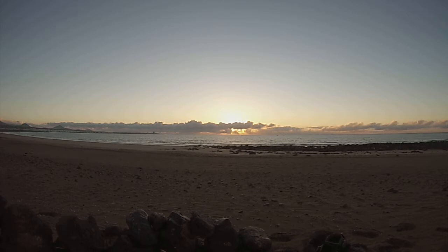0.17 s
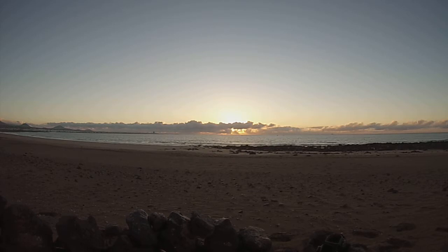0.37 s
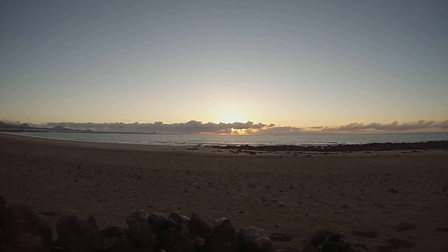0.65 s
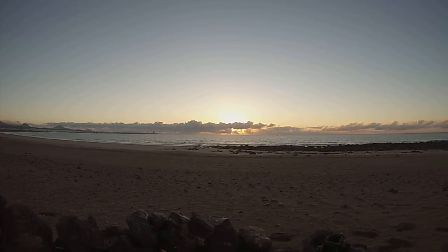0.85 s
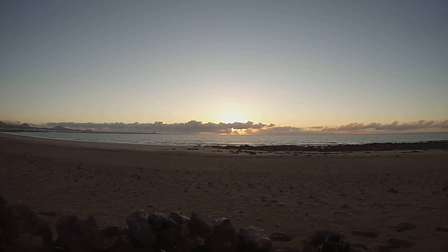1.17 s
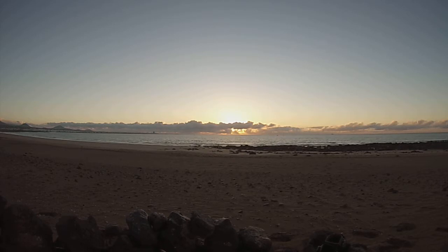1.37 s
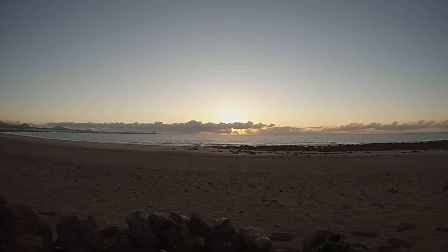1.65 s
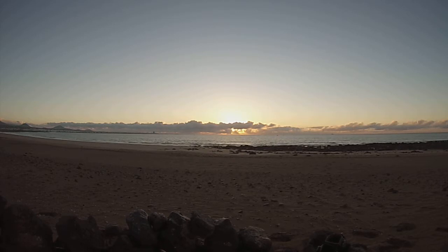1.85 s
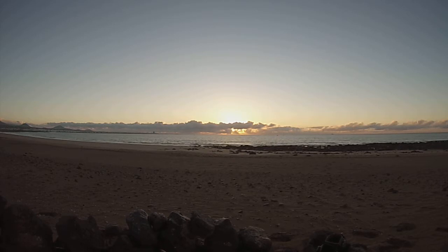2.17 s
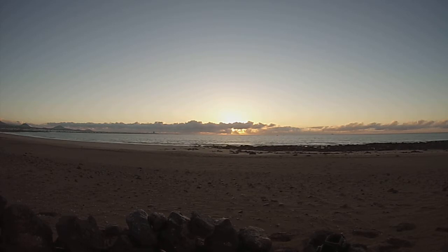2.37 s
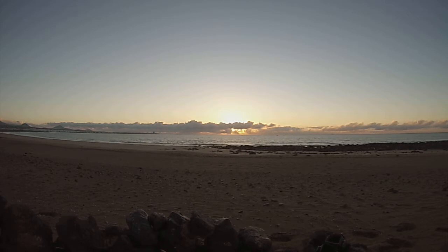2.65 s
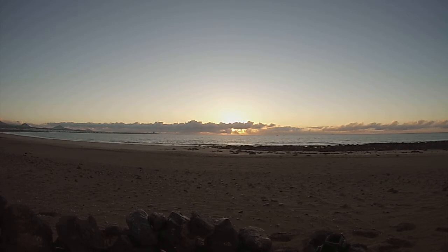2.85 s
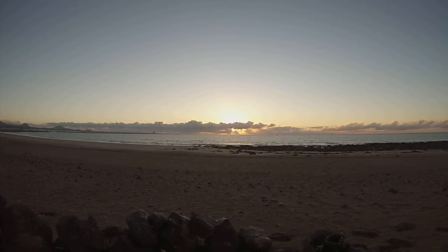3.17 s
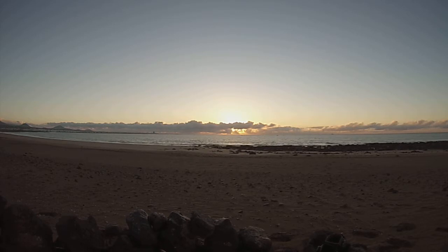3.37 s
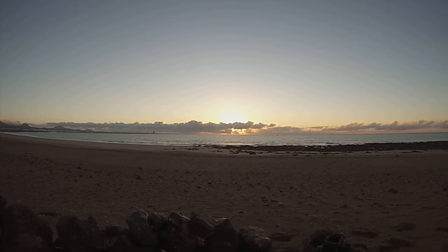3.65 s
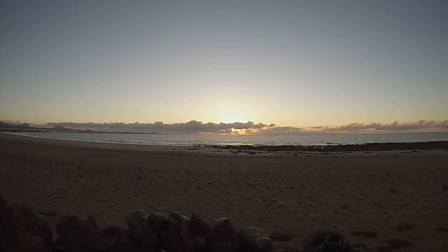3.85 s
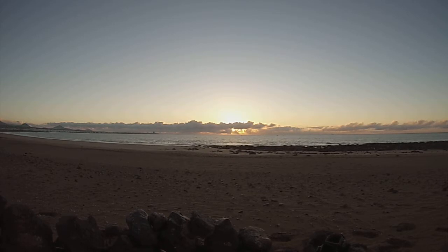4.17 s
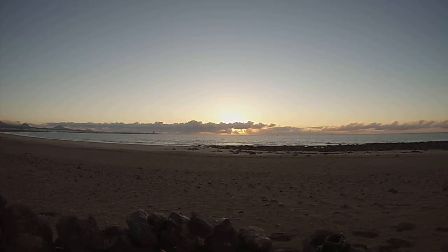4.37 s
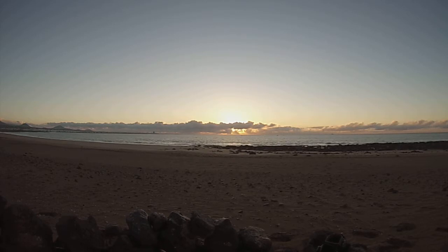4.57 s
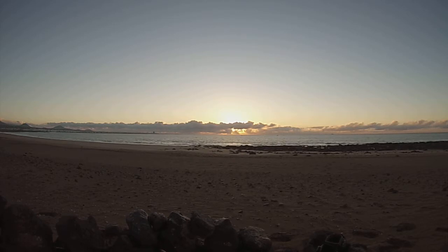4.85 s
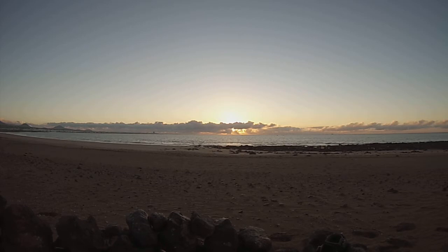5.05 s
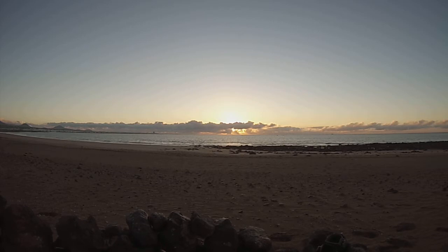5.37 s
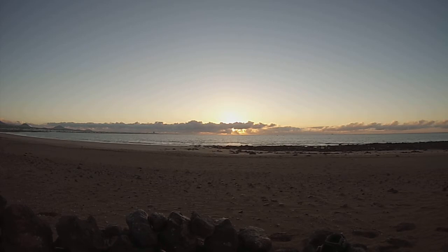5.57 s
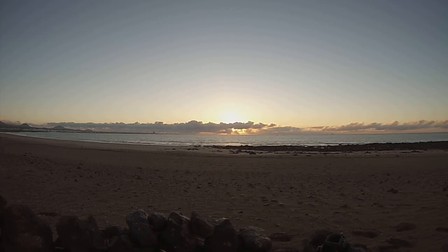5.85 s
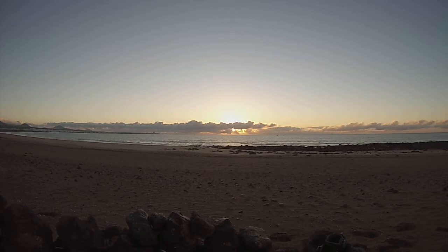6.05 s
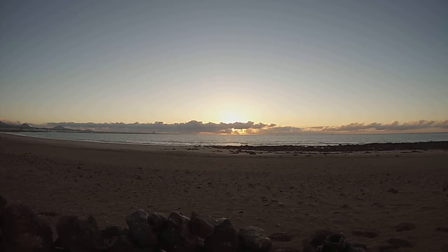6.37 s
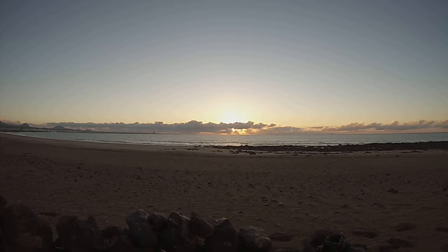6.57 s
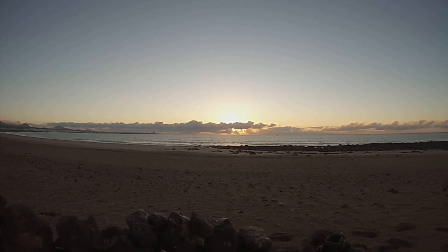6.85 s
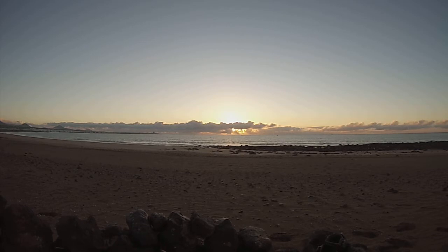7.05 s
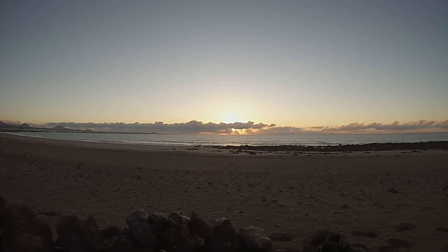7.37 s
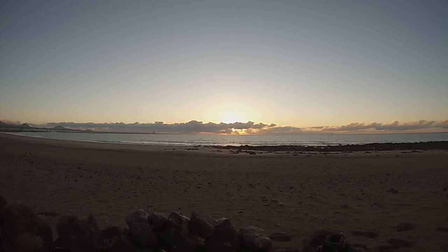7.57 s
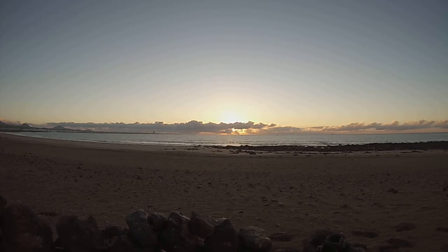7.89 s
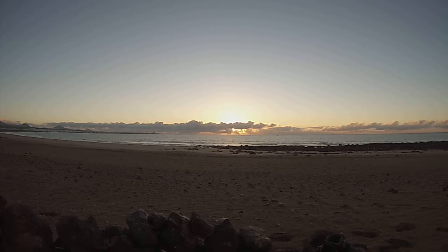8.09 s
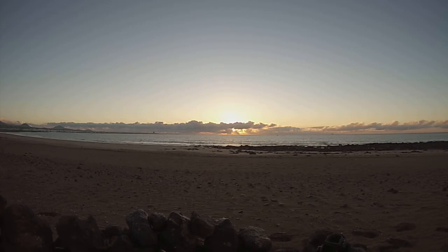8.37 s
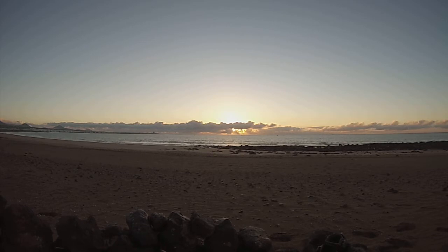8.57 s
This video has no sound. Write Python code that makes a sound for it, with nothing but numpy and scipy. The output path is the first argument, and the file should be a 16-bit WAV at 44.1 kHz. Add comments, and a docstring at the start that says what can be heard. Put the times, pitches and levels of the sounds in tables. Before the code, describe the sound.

On an open beach, faint far surf and light microphone hiss lie beneath a distant turboprop aircraft. From 0 to 1 s its low drone is steady while the airy rush is weak and patchy, with a brief puff near 0.6 s. Gusts lift it in quick swells around 1.2 and 1.8 s, then it climbs steeply from 2 to 3 s into a broad, buzzing roar, chopped rapidly by the blades. From 3 to 6 s it stays strong and fluttering, with a dip near 4.1 s; blade hum and gear tones come forward. It is fullest around 6.4 s, with hissy high turbine whine strongest near 7 s, as all pitches slide downward. After 7.9 s the rush falls away, still sounding at 8.7 s. Mono, midrange-heavy, hollow ringing colour from a small enclosed camera, softened top.

```python
"""On a beach, an aircraft flies past in a straight line while far surf lies underneath, as shaped noise.
Its rush is noise that throbs once per blade; its low exhaust roar is smoother noise. Blade and gear hum and
turbine whines are sine tones. Throb and tones slide down in pitch as it passes. Gusty air makes the rush
surge, and the closed case of a small camera rings at a few pitches and shades the treble by direction."""
import sys
import numpy as np
from scipy import signal
from scipy.fft import rfft, irfft, next_fast_len
from scipy.io import wavfile
from scipy.ndimage import uniform_filter1d, map_coordinates

SR = 44100
rng = np.random.default_rng(int(sys.argv[2]) if len(sys.argv) > 2 else 0)


def to_wav(sig):
    """Store sig (one row per channel, or 1-D mono) as 16-bit WAV at the path in sys.argv[1].

    Samples outside -1..1 are clipped; the rate is SR.
    """
    pcm = np.clip(np.atleast_2d(sig), -1, 1) * 32767
    pcm = np.round(pcm).astype(np.int16)
    wavfile.write(sys.argv[1], SR, pcm.T)  # frames by channels


N = 384552  # length in samples
FRAME, HOP = 1024, 256  # samples per short-time spectrum, and between spectra

# The flight
MACH = .1687  # ground speed over the speed of sound
PASS_S = 2.797  # seconds the aircraft needs to fly a length equal to its closest distance
ABEAM_S = 7.343  # second at which the sound from the closest point arrives
BLADE_HZ = 69.204  # blades passing per second at the source

# Angles in degrees at which the hum, whine and colour tables are read; negative is before abeam (side-on).
AIM_DEG = [-72, -67, -60, -47, -33, -23, -3, 12, 26]

# Band edges of the rush in Hz. From low to high its bands are low, body, sizzle, hiss and air.
RUSH_EDGES_HZ = [1000, 1900, 2900, 5400, 7500, 10500]
# Slow level of the rush, before gusts. Each row: time in seconds, body level in dB.
RUSH_LEVEL = [(0, -58), (.15, -66.5), (.45, -69), (1, -61.5), (1.5, -60.5), (1.9, -58.5), (2.35, -50.5),
              (2.75, -47.5), (3.1, -44), (3.9, -45.5), (4.4, -43.5), (5.3, -45), (6.4, -41), (7.1, -43),
              (7.85, -44.5), (8.15, -50.5), (8.72, -51.5)]
# Colour of the rush by direction. One row per band: low and sizzle in dB over the body,
# then hiss and air in dB over the sizzle. Each column is one angle of AIM_DEG.
RUSH_COLOUR = [(0, -5.5, -7, -5.5, -4, -5.5, -5, -0.5, -1.5),
               (-6, -1, -6.5, -3.5, -9, -12.5, -11.5, -8.5, -6),
               (-27, -36, -22.5, -18.5, -11, -10.5, -4, -4, -12),
               (-20, -27, -23, -14, -12.5, -13.5, -18.5, -22.5, -19)]

# Swells and lulls as gusts bend the sound.
# Each row: middle in seconds, half width in seconds, body change in dB, sizzle change in dB.
SURGES = [(.58, .04, 6.5, 8), (1.08, .08, 3.5, -0.5), (1.2, 0.086, 7.5, 4.5), (1.77, 0.056, 11.5, 11),
          (2.0, 0.1, 1, 9.5), (2.18, 0.047, 2, 12.5), (2.3, 0.04, -1, 9), (2.41, 0.061, 4, 6),
          (2.53, 0.075, 7, 6.5), (2.64, 0.034, -1.5, -2), (2.93, 0.13, 2.5, 2), (3.12, 0.025, 1.5, 2),
          (3.23, 0.057, 0, 5), (3.34, 0.027, -6, 0), (3.42, 0.075, 1, -4.5), (3.78, 0.062, 0.5, 5.5),
          (3.91, 0.027, -2, -2), (4.11, 0.13, -7, -7.5), (4.25, 0.069, 6.5, 4.5), (4.7, .05, 1, -6),
          (4.97, 0.034, -3, -6), (5.05, 0.016, 2, 3.5), (5.65, 0.095, 2.5, 2.5), (5.9, 0.049, -3.5, -3.5),
          (6.0, 0.046, 1.5, 2), (6.13, 0.059, -3, -1.5), (6.26, .05, 1, 3), (6.68, .03, -4.5, -3.5),
          (7.53, 0.045, 7, 4.5), (7.72, 0.035, 2, 3), (7.85, .035, 2.5, 7.5), (8.55, 0.05, 3.5, 3.5)]
# Small random gusts: strength in dB and random points per second, for body and sizzle, then for the treble
SHIMMER_DB, SHIMMER_RATE = 0.84, 11
TREBLE_SHIMMER_DB, TREBLE_RATE = 1.6, 19

# Resonances of the camera case. Each row: centre in Hz, width in Hz, relative strength in dB.
CASE_RINGS = [(1094, 67, -23), (1500, 366, -2), (1920, 90, -14), (2298, 206, 3.5), (2468, 470, -1),
              (2720, 119, 3.5), (3240, 320, -9), (3565, 420, -0.5), (3930, 490, -6), (4480, 480, -4),
              (5110, 500, -6.5), (5770, 670, -5), (6760, 2400, -15.5), (7980, 870, -18), (9280, 550, -26.5)]
# Two shadows of the case slide with direction. Each row: degrees past abeam, lower centre in Hz,
# lower depth in dB, upper centre in Hz, upper depth in dB (negative is a boost).
CASE_SHADOWS = [(-72, 6200, 7, 7150, -8), (-57, 5700, 18, 7100, 4), (-41, 5900, 7, 7300, 12),
                (-38, 5900, 7, 7640, 11), (-26, 5800, 10, 8200, 7), (-11, 6700, 1, 7900, 20),
                (31, 5600, 5, 8200, 13)]
# Narrow dips of the case. Each row: centre in Hz, width in Hz, then depth in dB when coming, nearing
# and leaving (negative counts as none).
CASE_DIPS = [(1220, 130, 3.5, 1, -1), (1777, 67, 8, 14, 4), (2843, 102, -3.5, 10, 13),
             (3498, 101, 15, 15, -1.5), (3306, 48, 8.5, -2.5, 17), (4520, 180, 12, -8.5, 4.5),
             (3780, 270, 1.5, 4, 5.5), (4190, 99, 5, -2, 7), (4850, 230, 2, -1, 15),
             (5200, 440, 2.5, 0.5, 0.5), (8700, 200, 3, 0, 12), (9330, 610, 8.5, -1.5, 9)]
# Bearings for those three depths: distance along the flight line over total distance (no unit).
DIP_BEARINGS = [-.85, -.4, .25]
PORT_HZ, PORT_DB_PER_KHZ = 9900, 5  # the case lets less and less through above this pitch

# Band edges of the exhaust roar in Hz: rumble, drone and roar.
ROAR_EDGES_HZ = [40, 160, 450, 1000]
# Angles in degrees past abeam at which the roar table is read.
ROAR_DEG = [-72, -47, -23, -3, 26]
# The exhaust's beam. One row per band, one column per angle of ROAR_DEG: dB at the closest distance.
ROAR_BEAMS = [(-56.5, -56.5, -55.5, -56.5, -57), (-54.5, -55, -54, -54.5, -62.5),
              (-60.5, -62, -63, -64, -65)]
# Shape of the exhaust noise inside its bands. Each row: frequency in Hz, relative density in dB.
EXHAUST_SHAPE = [(25, -17), (45, -7.5), (90, 3.5), (180, 1), (300, -6), (450, -14.5), (750, -17),
                 (1000, -17.5), (1500, -28), (2200, -120)]

# Blade and gear tones. Each row: pitch as a multiple of the blade rate, strength of its wavering in Hz.
HUM_TONES = [(1, .4), (2, .6), (14, 8), (22.05, 9)]
# Their beams. One row per tone, one column per angle of AIM_DEG: dB at the closest distance.
HUM_BEAMS = [(-66, -62.5, -60, -53.5, -57, -62, -68, -69, -58),
             (-63, -72, -80, -70.5, -55.5, -53, -56.5, -60, -72),
             (-69, -71, -67.5, -65.5, -62, -58.5, -62, -66.5, -70),
             (-82, -88, -70, -60, -57.5, -54, -51.5, -55.5, -63.5)]

# Turbine tones: pitches as multiples of the blade rate.
WHINE_ORDERS = [79.3, 80.27, 76]
# Their beams. One row per tone, one column per angle of AIM_DEG: dB over the sizzle.
WHINE_BEAMS = [(-41, -30, -25, -33, -16, -8.5, -4, -17.5, -17),
               (-23, -17.5, -25.5, -41, -29, -26, -10, -22, -34),
               (-40, -24, -41, -35, -29, -16, -11, -33, -33)]

# Shape of the surf noise. Each row: frequency in Hz, relative density in dB.
SURF_SHAPE = [(8.8, -21), (15, -3), (40, 3.5), (64, -11.5), (202, -7), (312, -9.5), (468, -8.5),
              (557, -12.5), (607, -9), (702, -19), (1930, -15.5), (2300, -12.5), (4870, -23), (15000, -33)]
SURF_DB = -61  # overall level of the surf

# Faint steady tones of the electronics. Each row: pitch in Hz, level in dB.
CIRCUIT_TONES = [(11999, -99), (14002, -107)]
TOP_HZ = 15250  # nothing is kept from here up


def amp(db):
    """Turns dB into gain."""
    return 10 ** (np.asarray(db) / 20)


def unit(x):
    """Scales x to an average strength (rms) of 1."""
    return x / np.sqrt(np.mean(x ** 2) + 1e-20)


def along(points, hz):
    """Reads (Hz, value) points on a log axis, closer to how we hear pitch."""
    point_hz, values = np.transpose(points)
    return np.interp(np.log(hz + 1), np.log(point_hz + 1), values)


def curves(rows, x):
    """Reads each column after the first at positions x of the first."""
    positions, *columns = np.transpose(rows)
    return np.array([np.interp(x, positions, column) for column in columns])


def wobble(rate):
    """A smooth random curve through this many random points a second."""
    points = rng.standard_normal(int(N * rate / SR) + 4)
    return map_coordinates(points, [np.arange(N) * rate / SR])


def patches(shape, bins, frames):
    """A random field of rms 1, smooth over some frequency bins and time frames."""
    field = uniform_filter1d(rng.standard_normal(shape), bins, 0)
    return unit(uniform_filter1d(field, frames, 1))


def grid():
    """Frequencies (as a column) and times of the short-time spectrum."""
    return np.fft.rfftfreq(FRAME, 1 / SR)[:, None], np.arange(-(-N // HOP) + 1) * HOP / SR


def shaped(x, gain):
    """Gives x its own gain at every frequency and moment."""
    spectrum = signal.stft(x, nperseg=FRAME, noverlap=FRAME - HOP)[2]
    return signal.istft(spectrum * gain, nperseg=FRAME, noverlap=FRAME - HOP)[1][:N]


def levelled(gain, edges_hz, levels_db):
    """Rescales the gain to bring white noise to the wanted level in each band, blending between bands."""
    hz = grid()[0][:, 0]
    lows, highs = np.array(edges_hz[:-1]), np.array(edges_hz[1:])
    power = np.array([np.sum(gain[(hz >= low) & (hz < high)] ** 2, axis=0) / len(hz)
                      for low, high in zip(lows, highs)])
    need_db = levels_db - 10 * np.log10(power)
    # each inner edge is a ramp from 0 to 1, so the correction changes gradually
    ramps = [np.clip((hz - edge) / (0.37 * edge) + .5, 0, 1) for edge in lows[1:]]
    return gain * amp(need_db[0] + np.transpose(ramps) @ np.diff(need_db, axis=0))


def sent(t):
    """When the sound heard at t left the aircraft, in seconds after its closest point."""
    since = t - ABEAM_S
    left = since
    for _ in range(6):  # the delay depends on the answer, so repeat until it settles
        left = since - MACH * np.hypot(left, PASS_S) + MACH * PASS_S
    return left


def angle(t):
    """Degrees of the aircraft past abeam, as heard at t."""
    return np.degrees(np.arctan2(sent(t), PASS_S))


def beams(rows, deg, t):
    """Directional loudness: each row of dB by angle, read at times t."""
    return np.array([np.interp(angle(t), deg, row) for row in rows])


def spread_db(t):
    """Sound pressure falls as one over distance: 0 dB at the closest point, less elsewhere."""
    return 20 * np.log10(np.cos(np.radians(angle(t))))


def phase(order, blur_hz):
    """Phase of a tone steady at the source, its pitch shifted by the motion and wavering in the air."""
    moved = order * BLADE_HZ * sent(np.arange(N) / SR)
    wavering = np.cumsum(blur_hz * wobble(25)) / SR
    return 2 * np.pi * (moved + wavering)


def gusts():
    """Gusts bend the sound into swells and lulls: dB per frame for body and sizzle, then hiss and air alone."""
    t = grid()[1]
    middle_s, width_s, *surge_db = np.transpose(SURGES)
    bumps = np.exp(-((t - middle_s[:, None]) / width_s[:, None]) ** 2)
    body_db, sizzle_db = surge_db @ bumps
    frames = np.minimum(np.arange(len(t)) * HOP, N - 1)
    rates = (SHIMMER_RATE, SHIMMER_RATE, TREBLE_RATE, TREBLE_RATE)
    shared, own, hiss, air = [wobble(rate)[frames] for rate in rates]
    return [body_db + SHIMMER_DB * shared,
            sizzle_db + SHIMMER_DB * (0.48 * shared + 1.17 * own),
            TREBLE_SHIMMER_DB * hiss,
            TREBLE_SHIMMER_DB * air]


def bands(gust_db):
    """Level of each rush band per frame: long waves feel the gusts less, and the treble has its own flicker."""
    t = grid()[1]
    body_gust, sizzle_gust, hiss_gust, air_gust = gust_db
    slow_db, = curves(RUSH_LEVEL, t)
    low_over, sizzle_over, hiss_over, air_over = beams(RUSH_COLOUR, AIM_DEG, t)
    low_db = slow_db + low_over + .2 * body_gust
    body_db = slow_db + body_gust
    sizzle_db = slow_db + sizzle_over + sizzle_gust
    hiss_db = sizzle_db + hiss_over + hiss_gust
    air_db = sizzle_db + air_over + 0.12 * sizzle_gust + .6 * hiss_gust + air_gust
    return [low_db, body_db, sizzle_db, hiss_db, air_db]


def case():
    """The camera case rings at fixed pitches; its dips and shadows follow the aircraft's direction."""
    hz, t = grid()
    ring = np.sqrt(sum(amp(db) ** 2 / (1 + (2 * (hz - centre) / width) ** 2) ** 2
                       for centre, width, db in CASE_RINGS))
    bearing = sent(t) / np.hypot(sent(t), PASS_S)
    dips_db = sum(np.interp(bearing, DIP_BEARINGS, np.clip(depth_db, 0, None))
                  * np.exp(-((hz - centre) / width) ** 2)
                  for centre, width, *depth_db in CASE_DIPS)
    low_hz, low_db, high_hz, high_db = curves(CASE_SHADOWS, angle(t))
    low_shadow = low_db * np.exp(-((hz - low_hz) / 280) ** 2)
    high_shadow = high_db * np.exp(-((hz - high_hz) / 380) ** 2)
    port_db = PORT_DB_PER_KHZ * np.clip(hz - PORT_HZ, 0, None) / 1000
    return ring * amp(-dips_db - low_shadow - high_shadow - port_db)


def rush(levels_db):
    """Turbulence noise chopped once per blade, flickering in the gusty air, heard through the case."""
    turn = 2 * np.pi * BLADE_HZ * sent(np.arange(N) / SR)
    chop_db = 2.2 + wobble(3)
    chop = amp(chop_db * np.cos(turn + .5 * wobble(4)))
    flicker = amp(0.6 * wobble(22) + 0.75 * wobble(70))
    gain = levelled(case(), RUSH_EDGES_HZ, levels_db)
    gain = gain * amp(1.03 * patches(gain.shape, bins=20, frames=9))
    return shaped(unit(chop * flicker * rng.standard_normal(N)), gain)


def roar():
    """The low exhaust roar: noise without the chop, louder in some directions and fading with distance."""
    hz, t = grid()
    shape = amp(along(EXHAUST_SHAPE, hz)) + 0 * t  # the same shape in every frame
    levels_db = beams(ROAR_BEAMS, ROAR_DEG, t) + spread_db(t)
    return shaped(rng.standard_normal(N), levelled(shape, ROAR_EDGES_HZ, levels_db))


def hum():
    """Blade and gear tones: sines at multiples of the blade rate, fading in and out a little."""
    t = np.arange(N) / SR
    levels_db = beams(HUM_BEAMS, AIM_DEG, t) + spread_db(t)
    out = np.zeros(N)
    for (order, blur_hz), level_db in zip(HUM_TONES, levels_db):
        # tones that waver more in pitch also flutter more in level
        fading_db = 1.4 * wobble(3.5) + 0.74 * wobble(8.4) + blur_hz * 0.39 * wobble(45)
        out += np.sqrt(2) * amp(level_db + fading_db) * np.sin(phase(order, blur_hz))
    return out


def whine(sizzle_db):
    """Turbine tones ride the same gusts as the sizzle; scattering spreads a hissy halo round each."""
    t = np.arange(N) / SR
    out = np.zeros(N)
    for order, over_db in zip(WHINE_ORDERS, beams(WHINE_BEAMS, AIM_DEG, t)):
        # random changes of strength and phase widen the tone
        near_halo = .6 * (wobble(120) + 1j * wobble(120))
        wide_halo = .7 * (wobble(450) + 1j * wobble(450))
        tone = np.imag((1 + near_halo + wide_halo) * np.exp(1j * phase(order, 14)))
        out += amp(over_db + 2.5 * wobble(14)) * tone
    return np.sqrt(2) * amp(np.interp(t, grid()[1], sizzle_db)) * out


def surf():
    """Far waves and microphone hiss: shaped noise, its level varied by random patches in time and frequency."""
    hz, t = grid()
    gain = amp(along(SURF_SHAPE, hz)) + 0 * t  # the same shape in every frame
    gain = gain * amp(patches(gain.shape, bins=30, frames=4))
    return amp(SURF_DB) * unit(shaped(rng.standard_normal(N), gain))


def scene():
    """Adds the aircraft's sounds and the surf in one channel."""
    levels_db = bands(gusts())
    sizzle_db = levels_db[2]
    aircraft = rush(levels_db) + roar() + hum() + whine(sizzle_db)
    return (aircraft + surf())[None]


def record(dry):
    """The electronics add faint steady tones; everything from the band limit up is removed."""
    t = np.arange(N) / SR
    tones = sum(np.sqrt(2) * amp(db) * np.sin(2 * np.pi * hz * t) for hz, db in CIRCUIT_TONES)
    size = next_fast_len(N + SR)  # the extra second keeps the end from wrapping onto the start
    keep = np.fft.rfftfreq(size, 1 / SR) < TOP_HZ
    return irfft(rfft(dry + tones, size) * keep, size)[..., :N]


dry = scene()
out = record(dry)
to_wav(out)
```